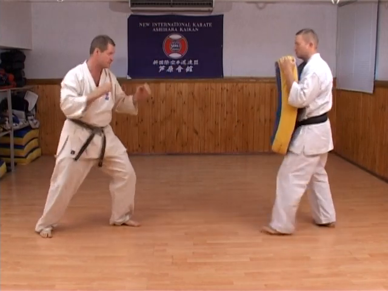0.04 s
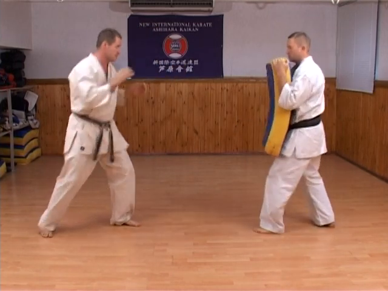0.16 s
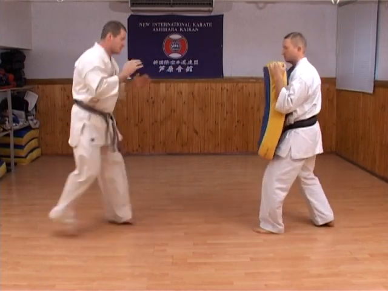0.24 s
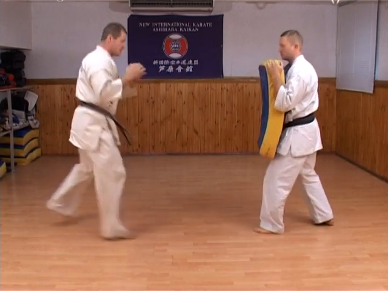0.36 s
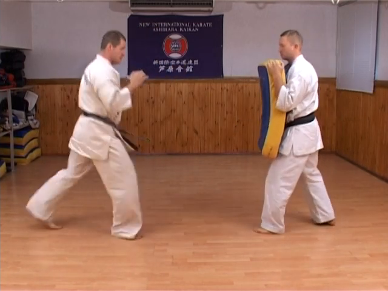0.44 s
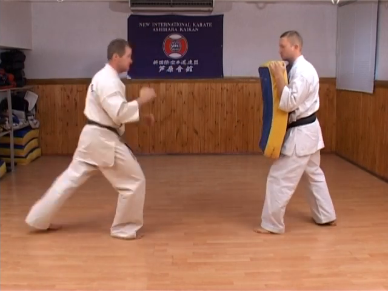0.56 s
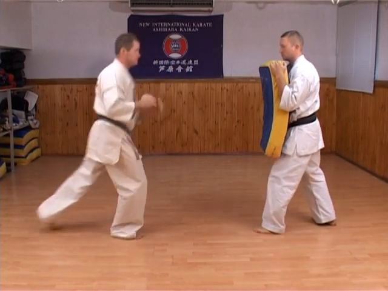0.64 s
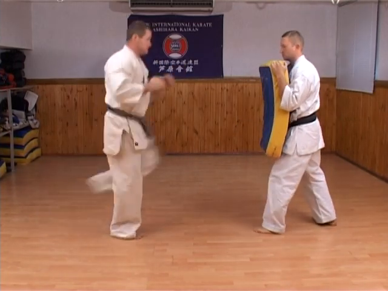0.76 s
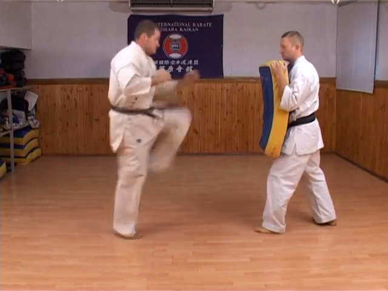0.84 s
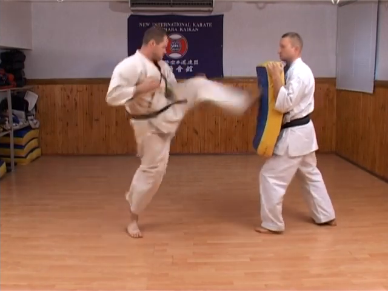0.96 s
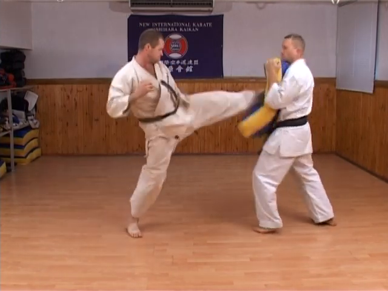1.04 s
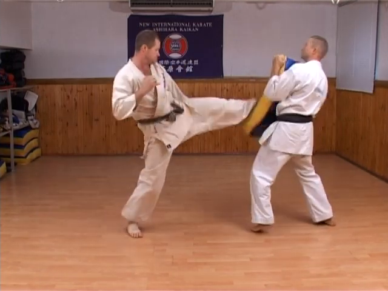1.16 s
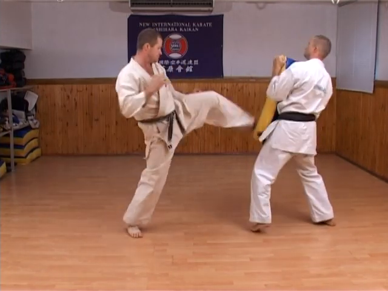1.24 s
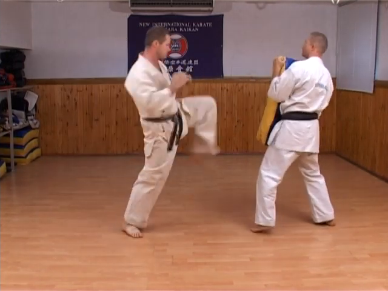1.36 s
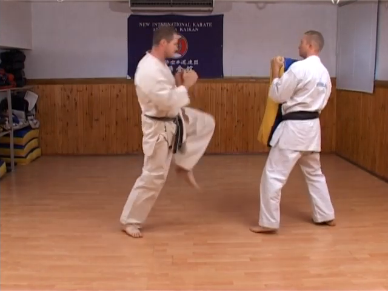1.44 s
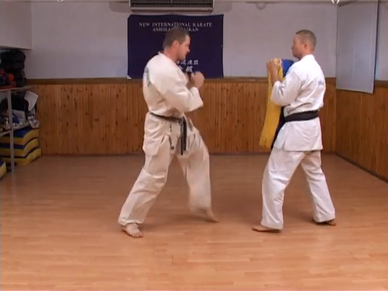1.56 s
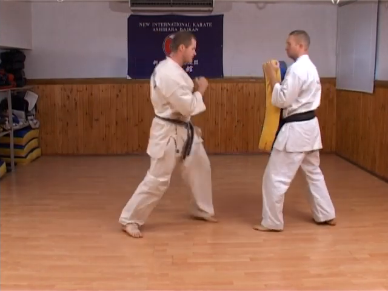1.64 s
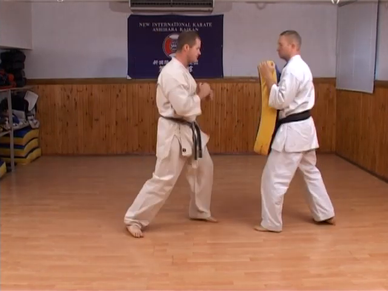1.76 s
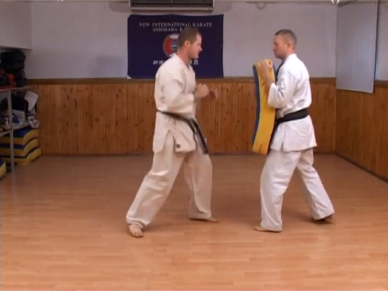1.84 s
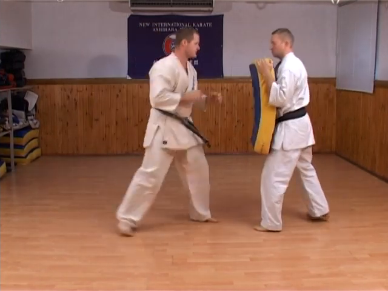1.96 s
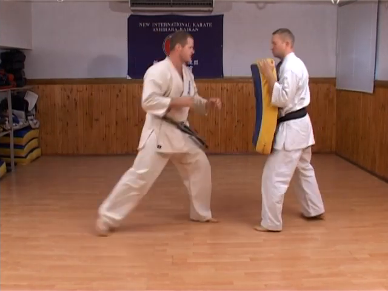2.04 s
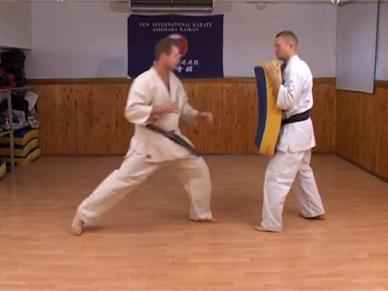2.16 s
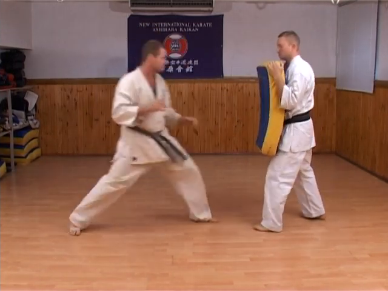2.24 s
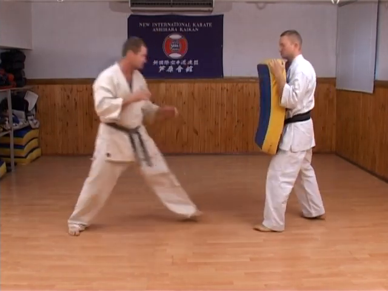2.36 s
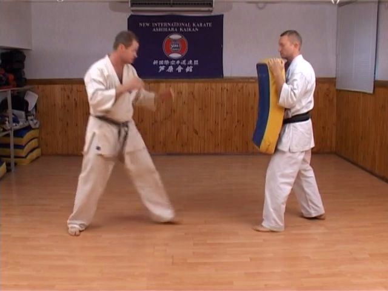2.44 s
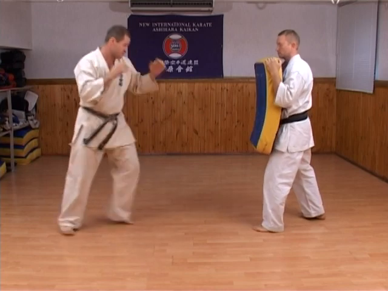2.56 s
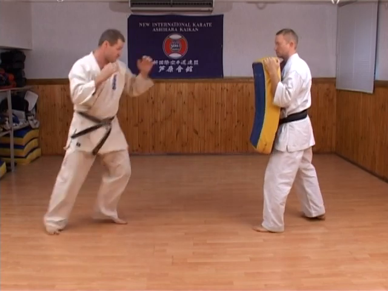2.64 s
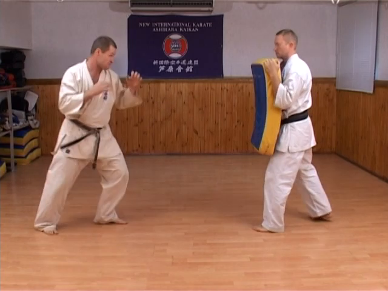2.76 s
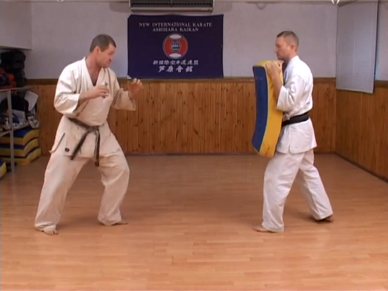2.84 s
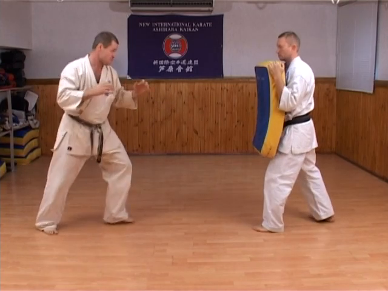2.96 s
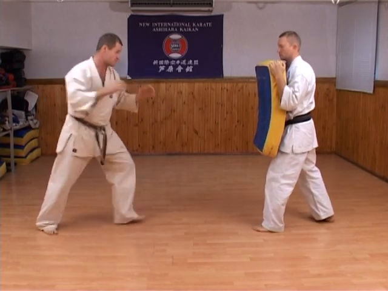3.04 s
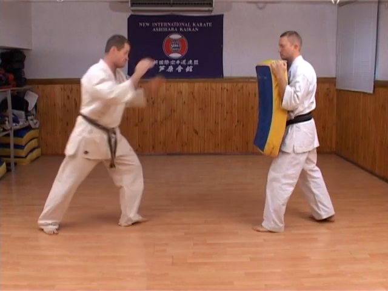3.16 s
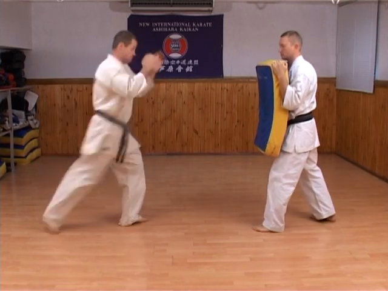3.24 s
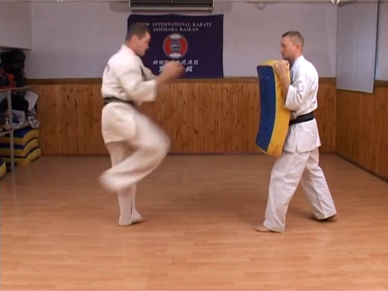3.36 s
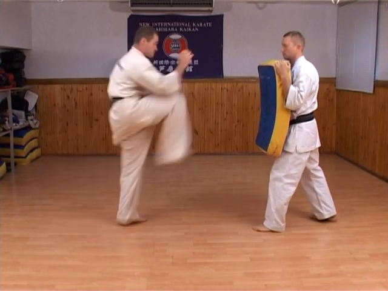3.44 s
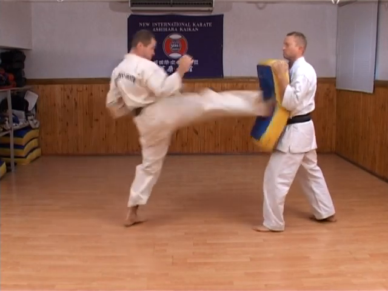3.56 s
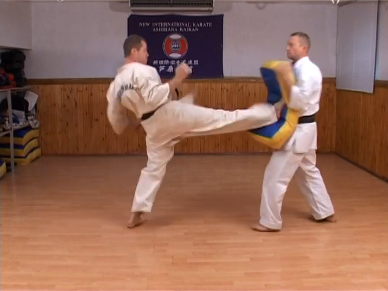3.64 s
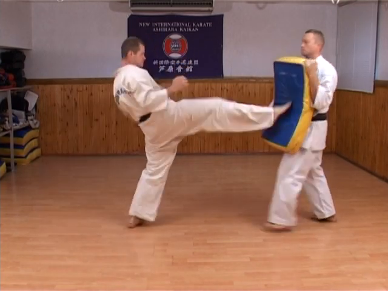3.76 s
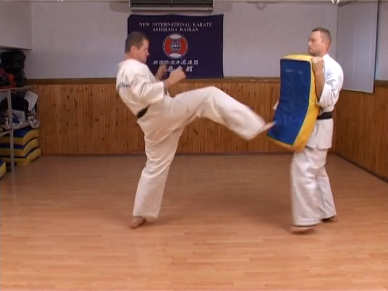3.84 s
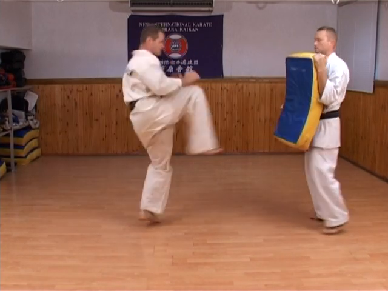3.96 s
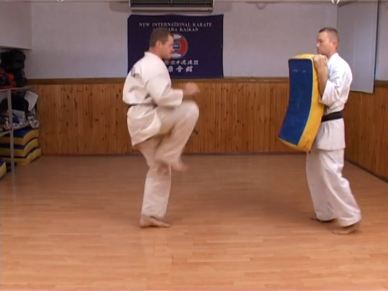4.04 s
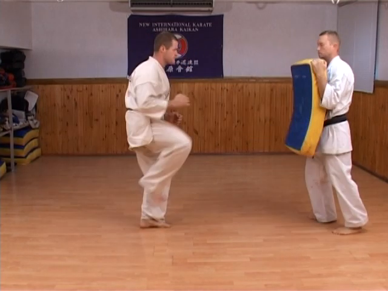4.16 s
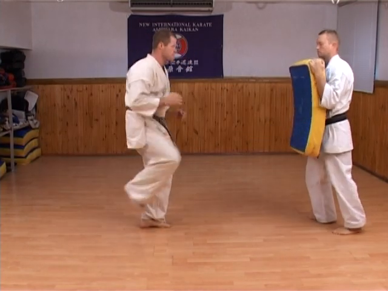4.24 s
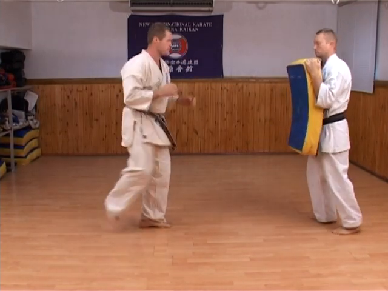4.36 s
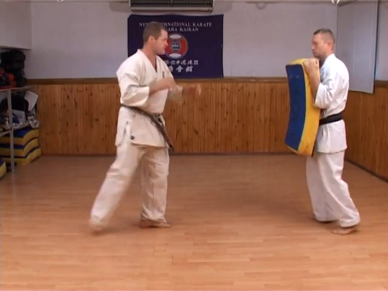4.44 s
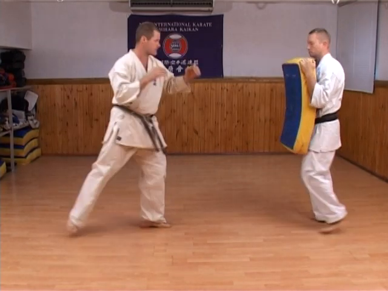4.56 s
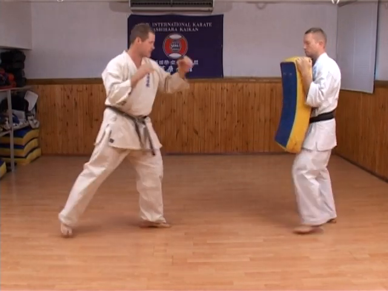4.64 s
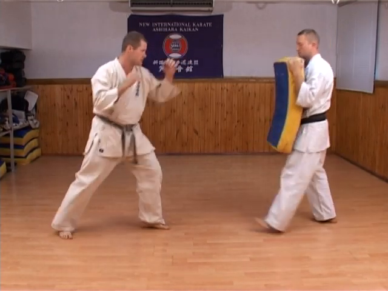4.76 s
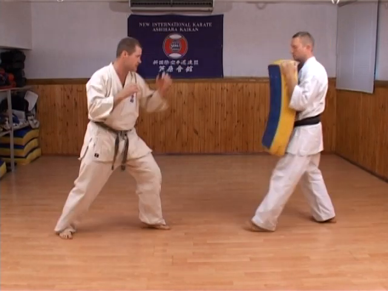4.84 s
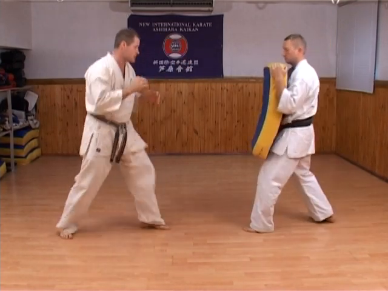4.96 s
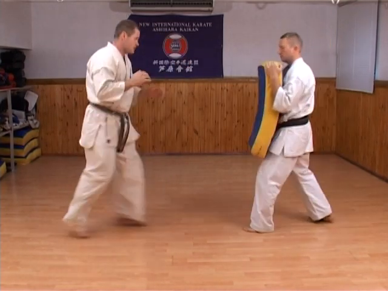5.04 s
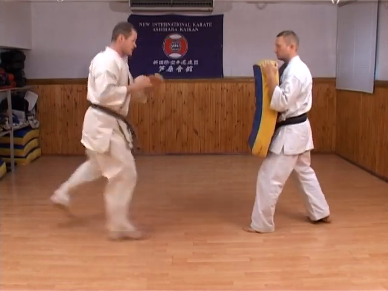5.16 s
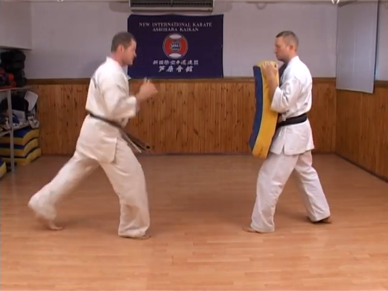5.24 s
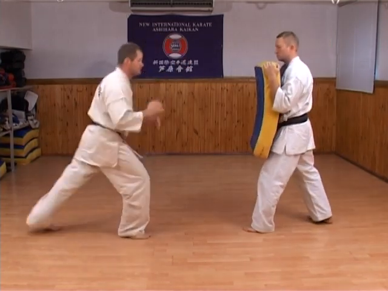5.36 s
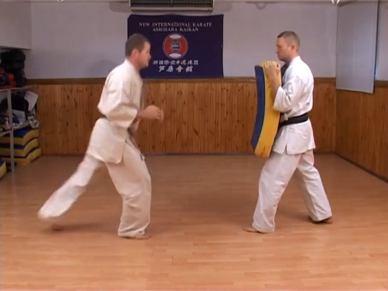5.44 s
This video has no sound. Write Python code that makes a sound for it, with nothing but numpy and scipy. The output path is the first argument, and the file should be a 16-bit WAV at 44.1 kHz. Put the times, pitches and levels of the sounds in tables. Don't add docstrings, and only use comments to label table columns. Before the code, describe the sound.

Two heavy kicks smack a hand-held foam shield in a bare hall, with cotton suits swishing and bare feet thudding between them.

```python
import sys
import numpy as np
from scipy import signal
from scipy.fft import rfft, irfft, next_fast_len
from scipy.io import wavfile
from scipy.ndimage import uniform_filter1d, map_coordinates

SR = 44100
rng = np.random.default_rng(int(sys.argv[2]) if len(sys.argv) > 2 else 0)


def output_pcm(signal):
    pcm = np.clip(np.atleast_2d(signal).T, -1, 1) * 32767
    wavfile.write(sys.argv[1], SR, np.round(pcm).astype(np.int16))


def decibels_to_gain(level_db):
    exponent = np.asarray(level_db, float) / 20
    return 10 ** exponent


N = 242991


def along(points, hz):
    f, v = np.transpose(points)
    return np.interp(np.log(hz + 1), np.log(f + 1), v)


def coloured(points):
    return lambda f: decibels_to_gain(along(points, f))


def resonance(f, hz, width_hz):
    return 1j * f * width_hz / (hz * hz - f * f + 1j * f * width_hz + 1e-9)


def unit(x):
    return x / np.sqrt(np.mean(x ** 2) + 1e-20)


def filtered(x, response):
    m = next_fast_len(x.shape[-1] + 8192)
    spectrum = rfft(x, m) * response(np.fft.rfftfreq(m, 1 / SR))
    return irfft(spectrum, m)[..., :x.shape[-1]]


def evened(x, size):
    z = rfft(x, 2 * len(x))
    return irfft(z / (uniform_filter1d(np.abs(z), size=size) + 1e-12))[:len(x)]


def wobble(rate_hz):
    knots = rng.standard_normal(int(N * rate_hz / SR) + 4)
    return map_coordinates(knots, [np.arange(N) * rate_hz / SR])


def rush(spectrum):
    return unit(filtered(rng.standard_normal((2, N)), coloured(spectrum)))


def burst(t60_s, rise_s, colour):
    t = np.arange(SR // 5) / SR
    rise = 1 - np.exp(-t / rise_s)
    shape = rise * decibels_to_gain(-60 * t / max(t60_s, .002))
    noise = evened(rng.standard_normal(len(t)) * shape, size=60)
    puff = filtered(noise * rise, colour)
    return puff / np.abs(puff).max()


def hall(sound, colour, build_s, size=SR * 2 // 3):
    # f/Hz, t60/s
    hall_t60 = [(60, 0.46), (110, 0.56), (180, 0.33), (280, 0.58), (450, 0.38), (1100, 0.57), (2900, 0.62),
                (7700, 0.61), (13000, 0.45)]
    hz, t, z = signal.stft(rng.standard_normal((2, size)), SR, nperseg=512)
    decay = decibels_to_gain(-60 * t / along(hall_t60, hz)[:, None])
    tail = signal.istft(z * decay, SR, nperseg=512)[1][:, :size]
    build = 1 - np.exp(-(np.arange(size) / SR / build_s) ** 2)
    tail = filtered(tail, colour) * build
    return tail * np.linalg.norm(sound) / np.linalg.norm(tail[0])


def add(out, s, near, answer):
    start = round(s * SR)
    out[:, start:][:, :len(near)] += near
    out[:, start:][:, :answer.shape[1]] += answer


def still():
    # f/Hz, level/dB per Hz
    air_colour = [(15, -41.5), (35, -8.5), (65, 4), (140, -2.5), (260, -1.5), (600, -2.5), (1050, -1.5),
                  (1400, -5), (3000, -8.5), (6400, -14), (9800, -14.5), (11000, -45), (13000, -55.5)]
    # f/Hz, level/dB rms, unsteadiness/dB
    hum_tones = [(98, -64.5, -2), (214, -77.5, -2)]
    t = np.arange(N) / SR
    hum = 0
    for hz, db, sway_db in hum_tones:
        level = decibels_to_gain(db + 4.5 + sway_db * wobble(26))
        hum = hum + level * np.sin(2 * np.pi * hz * t + 0.52 * wobble(3.0))
    air_db = -58 + 0.5 + 0.6 * wobble(3.2)
    return decibels_to_gain(air_db) * rush(air_colour) + hum


def motion():
    # fastest at t/s, wind-up/s, sleeve swish/dB, slide and weave rustle/dB
    moves = [(0.196, 0.097, -49.5, -53), (0.3, 0.04, -47.5, -52.5), (0.42, 0.15, -50, -71),
             (0.54, 0.051, -45.5, -65), (0.76, 0.072, -45, -56.5), (0.88, 0.13, -44, -63),
             (1.022, 0.15, -38, -46), (1.4, 0.28, -44, -53.5), (1.565, 0.067, -50, -54),
             (1.74, 0.19, -48, -53), (2.134, 0.037, -55.5, -77), (2.242, 0.041, -51, -53),
             (2.47, 0.11, -53.5, -48), (2.65, 0.2, -52, -51.5), (2.808, 0.13, -49.5, -54),
             (3.2, 0.017, -51, -57.5), (3.5, 0.25, -41, -53.5), (3.509, 0.0056, -43, -44.5),
             (3.6, 0.11, -46.5, -53), (3.95, 0.081, -40.5, -51.5), (4.112, 0.062, -40, -46.5),
             (4.586, 0.063, -52, -60.5), (4.761, 0.035, -47.5, -52.5), (5.12, 0.3, -48, -51.5),
             (5.21, 0.23, -49.5, -64), (5.34, 0.12, -41, -49)]
    # f/Hz, level/dB per Hz
    swish_colour = [(60, -22), (110, -7), (200, -3), (350, -1.5), (620, -1.5), (1000, -2), (1300, -10),
                    (2500, -17), (5000, -43.5)]
    # f/Hz, level/dB per Hz
    rustle_colour = [(700, -18.5), (1200, -10), (2400, -4.5), (3400, -6.5), (4500, -4), (5300, -12.5),
                     (6400, -8.5), (9000, -16.5), (10500, -9.5), (13000, -56.5)]
    s, wind_up_s, swish_db, rustle_db = np.transpose(moves)[..., None]
    after_s = np.arange(0, N + 64, 64) / SR - s
    rise = np.clip(1 + after_s / np.maximum(wind_up_s, .004), 0, 1) ** 0.88

    def level(db, fade_db_per_s):
        each = rise * decibels_to_gain(db - fade_db_per_s * np.maximum(after_s, 0))
        total = np.sqrt(np.sum(each ** 2, axis=0))
        return np.interp(np.arange(N) / 64, np.arange(len(total)), total)

    swish = level(swish_db, fade_db_per_s=76) * decibels_to_gain(1.9 * wobble(37)) * rush(swish_colour)
    clumps = decibels_to_gain(0.73 * wobble(34) + 2.4 * wobble(300))
    rustle = level(rustle_db, fade_db_per_s=94.5) * clumps * rush(rustle_colour)
    return swish + rustle


def thuds():
    # t/s, peak/dB, centre f/Hz, t60/s
    footfalls = [(0.494, -25, 730, 0.02), (0.51, -22, 500, 0.07), (1.669, -32.5, 294, 0.033),
                 (2.786, -35.5, 484, 0.058), (3.094, -45, 736, 0.058), (3.329, -41, 557, 0.16),
                 (3.415, -33, 590, 0.09), (3.492, -27, 373, 0.049), (3.519, -29, 505, 0.079),
                 (4.672, -40, 850, 0.037), (5.261, -19, 342, 0.021)]
    # t/s, peak/dB, centre f/Hz, t60/s
    flaps = [(0.328, -34.5, 635, 0.075), (0.441, -24, 484, 0.096), (0.457, -20, 487, 0.1),
             (1.649, -28, 792, 0.092), (3.197, -44.5, 650, 0.021), (0.718, -39, 593, 0.045),
             (0.744, -37.5, 517, 0.027), (0.884, -31, 604, 0.062), (1.533, -35, 766, 0.045),
             (2.034, -46.5, 530, 0.066), (2.235, -36.5, 460, 0.018), (2.27, -34, 567, 0.089),
             (4.029, -32, 710, 0.018), (4.119, -35, 724, 0.043), (4.215, -38, 540, 0.05),
             (4.748, -35, 520, 0.31), (4.981, -38.5, 570, 0.024), (5.246, -24, 720, 0.081),
             (5.267, -19, 430, 0.043), (5.289, -18, 825, 0.018)]
    out = np.zeros((2, N + SR))
    # boom/dB, boom f/Hz, width over centre
    for rows, boom_db, boom_hz, width in ((footfalls, -15, 105, 0.95), (flaps, -15, 236, 0.54)):
        for s, db, hz, t60_s in rows:
            sole = lambda f: (resonance(f, hz, width * hz) * resonance(f, 460, 670)
                              / (1 + 1j * (f / 1200) ** 3))
            pad = decibels_to_gain(db - 1.5) * burst(t60_s, .002, sole)
            boom = decibels_to_gain(db + boom_db) * burst(0.35, 0.008, lambda f: resonance(f, boom_hz, 125) ** 2)
            add(out, s, pad + boom, hall(pad, sole, build_s=0.0067))
    return out[:, :N]


def snaps():
    # t/s, peak/dB, centre f/Hz, hall/dB (more when the cloth faces away)
    cracks = [(0.4987, -20, 4160, 0.5), (0.5086, -24.5, 2920, 2), (0.9172, -57, 2490, 0),
              (1.9349, -40, 4000, -3), (2.12, -41, 3600, 2), (2.4263, -40, 4370, 13),
              (2.553, -46.5, 4320, 14), (2.6313, -38, 4300, 9), (2.8533, -42, 4320, 1),
              (3.1975, -48.5, 3870, 15.5), (3.9748, -36, 4570, 1), (4.1199, -40.5, 3410, 7),
              (4.5819, -45, 2730, -3), (4.7425, -44, 4530, 12.5), (4.761, -33, 3520, 0),
              (4.9311, -38, 4880, -2), (5.236, -33.5, 4670, 9), (5.284, -28, 4500, -11),
              (5.3004, -23.5, 4200, -12), (5.029, -51.5, 4700, 0)]
    # t/s, peak/dB, centre f/Hz, hall/dB
    skin_ticks = [(0.4398, -37, 4460, 18), (1.5637, -42.5, 2550, 0), (1.6476, -23.5, 3980, 4),
                  (2.2716, -35.5, 5960, 5.5), (2.6538, -34, 4410, 0.5), (3.5063, -27.5, 4540, 3),
                  (3.517, -30.5, 4500, -5), (4.5265, -43, 3690, 0.5), (5.2583, -19.5, 4660, -2.5),
                  (5.2626, -21, 4100, 3), (5.267, -31, 4070, 8.5), (4.0855, -30, 3620, -7)]
    # f/Hz, level/dB per Hz
    weave = [(500, -4.5), (1300, 7), (2500, 8.5), (4500, 1.5), (6500, -5), (11500, -2), (14000, -33)]
    out = np.zeros((2, N + SR))
    for rows, broad_share in ((cracks, 0.1), (skin_ticks, 0.62)):
        for s, db, hz, hall_db in rows:
            cotton = lambda f, centre: (broad_share * decibels_to_gain(along(weave, f))
                                        + np.abs(resonance(f, centre, 0.34 * centre)) ** 2)
            crack_hz = 0.5 * hz + 0.47 * 5000
            delayed = lambda f: cotton(f, crack_hz) * np.exp(-2j * np.pi * f * .0005)
            t60_s = 0.015 * np.exp(-0.02 * (db + 34.5))
            tick = decibels_to_gain(db + 1.5) * burst(t60_s, 0.00072, delayed)
            answer = decibels_to_gain(hall_db - 0.5) * hall(tick, lambda f: cotton(f, hz), build_s=0.0021)
            add(out, s, tick, answer)
    return out[:, :N]


def kicks():
    kick_s = [
        1.0408,
        3.6172,
    ]
    # slap/dB, thump over slap/dB, slap length/s, thump t60/s
    strengths = [
        (-10, 11.5, 0.0055, 0.038),
        (-12, 12.5, 0.0069, 0.044),
    ]
    # f/Hz, width/Hz, gain/dB
    shield = [
        [(144.6, 89, -3), (270, 47, 3.5), (394, 107, 0), (686, 152, -1), (966, 180, -4.5), (1455, 190, -11)],
        [(152, 56, 0), (219.6, 39, 4), (370, 75, 2.5), (506, 160, -3), (682, 105, -1), (1030, 190, -8),
         (1238, 260, -12)],
    ]
    # f/Hz, level/dB per Hz
    vinyl = [(600, -8.5), (1500, -5.5), (2900, -5.5), (4500, -8.5), (6300, -11.5), (9000, -10.5),
             (11500, 0), (13400, -13), (15000, -27)]
    # delay/s, gain/dB
    echoes = [(0.017, -4.5), (.035, -9.5), (.054, -10.5), (0.079, -15.5)]
    out, t = np.zeros((2, N + SR)), np.arange(SR // 2) / SR
    walls = lambda f: 1 + sum(decibels_to_gain(g) * np.exp(-2j * np.pi * f * delay_s) for delay_s, g in echoes)
    far_vinyl = lambda f: coloured(vinyl)(f) / (1 + (f / 11000) ** 2)
    for s, (db, thump_db, length_s, t60_s), modes in zip(kick_s, strengths, shield):
        release = 0.068 * decibels_to_gain(-60 * (t - length_s) / 0.02)
        contact = np.where(t < length_s, 1.3 - 0.78 * t / length_s, release)
        contact = np.clip(t / 0.00065, 0, 1) * contact
        slap = unit(filtered(rng.standard_normal(len(t)), coloured(vinyl))) * contact * 0.37

        foam = lambda f: sum((-1) ** k * decibels_to_gain(g) * resonance(f, hz, width_hz)
                             for k, (hz, width_hz, g) in enumerate(modes))
        collapse = 0.072 + 1.7 * (1 - np.exp(-(t / 0.0079) ** 3))
        squeeze = collapse * decibels_to_gain(-60 * t / t60_s) * rng.standard_normal(len(t))
        thump = filtered(squeeze, lambda f: foam(f) * resonance(f, 300, 1300))
        thump = decibels_to_gain(thump_db) * thump / np.abs(thump).max()

        slap_echoes = filtered(slap, walls) - slap
        near = filtered(thump, walls) + slap + decibels_to_gain(-13) * slap_echoes
        answer = decibels_to_gain(12.5) * hall(slap, far_vinyl, 0.015, size=SR) + hall(thump, foam, 0.011, size=SR)
        boards = decibels_to_gain(-35.5 - 60 * t / 1.1) * np.sin(2 * np.pi * 36 * t) * (1 - np.exp(-t / .02))
        add(out, s, decibels_to_gain(db + 5.5) * (near + boards), decibels_to_gain(db + 4.5) * answer)
    return out[:, :N]


def spread(x):
    # f/Hz, side minus mid/dB
    side_gain = [(25, -11.5), (60, -35), (125, -28.5), (250, -38.5), (500, -39), (1000, -29.5), (2000, -30),
                 (4000, -24), (8000, -16.5)]
    # f/Hz, level/dB per Hz
    hiss = [(300, -20), (1500, -0.5), (4000, -7), (9600, -3.5), (10300, -30.5)]
    # f/Hz, share of time the channels differ
    split = [(60, 0.84), (340, 0.72), (700, 0.48), (1400, 0.59), (3400, 0.94), (8000, .93)]
    side = filtered(x[1], coloured(side_gain)) + decibels_to_gain(-74.0) * rush(hiss)[0]
    hz, t, z = signal.stft(np.pad([x[0], side], ((0, 0), (144, 0))), SR, nperseg=2048)
    band = (12 * np.log(1 + hz / 700)).astype(int)
    loud_db = 10 * np.log10(np.sum(np.abs(z[0]) ** 2, axis=0) + 1e-12)
    loud = 1 / (1 + decibels_to_gain(-1.5 * (loud_db + 41)))
    share = along(split, hz)[:, None] * (1 - .8 * loud)
    differ = rng.random((band.max() + 1, len(t)))[band] < share
    side = signal.istft(z[1] * differ * decibels_to_gain(8 * loud), SR, nperseg=2048)[1][144:][:N]
    return np.array([x[0] + side, x[0] - side])


def scene():
    return spread(still() + motion() + thuds() + snaps() + kicks())


def band_limit(x):
    return signal.sosfilt(signal.butter(12, 14390, fs=SR, output="sos"), x)


def record(dry):
    # f/Hz, gain/dB
    capsule = [(6300, -2.5), (7050, -9.5), (7900, -7), (8700, -14.5), (9500, -10.5), (10400, -17.5),
               (11500, -15)]
    top_hz = 14500
    dry = filtered(dry, lambda f: decibels_to_gain(along(capsule, f)) / (1 + (f / top_hz) ** 60))
    power = signal.lfilter([1 / 128], [1, 1 / 128 - 1], np.mean(dry ** 2, axis=0))
    ramp_db = 70 * np.arange(N) / SR
    held_db = np.maximum.accumulate(10 * np.log10(power + 1e-12) + ramp_db) - ramp_db
    x = dry * decibels_to_gain(-.55 * np.clip(held_db + 14.5, 0, None))
    x = x / (1 + np.abs(x / .85) ** 4) ** (1 / 4)
    return band_limit(x)


dry = scene()
out = record(dry)
output_pcm(out)
```